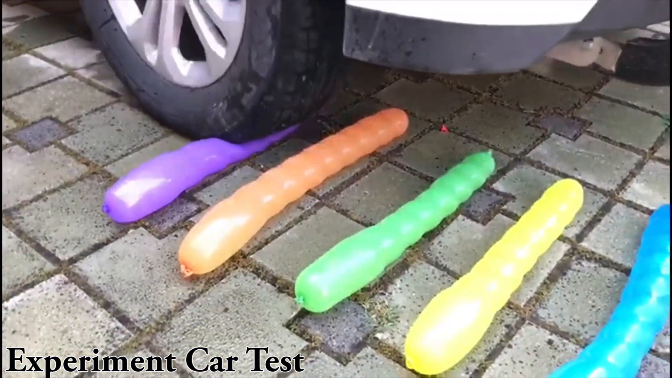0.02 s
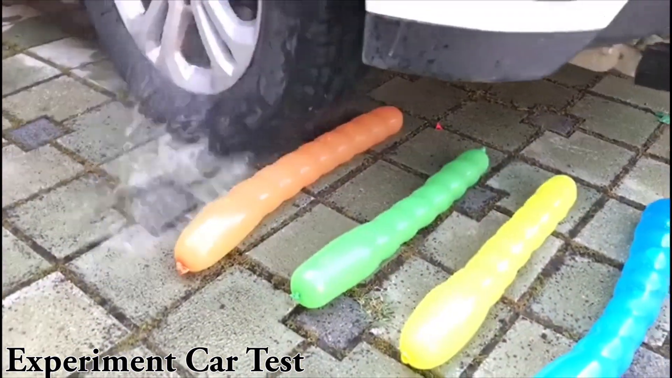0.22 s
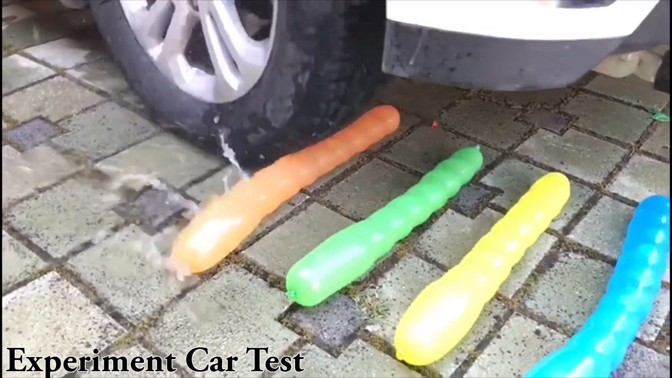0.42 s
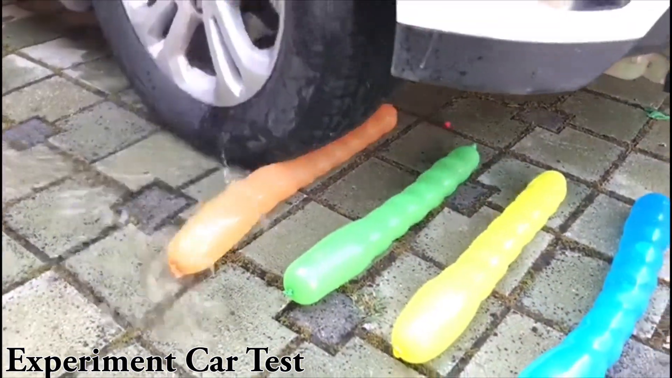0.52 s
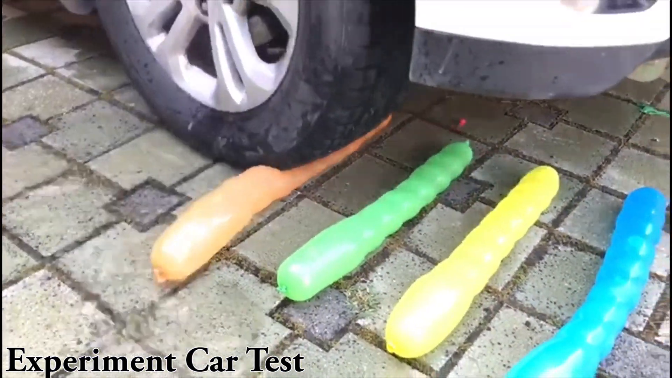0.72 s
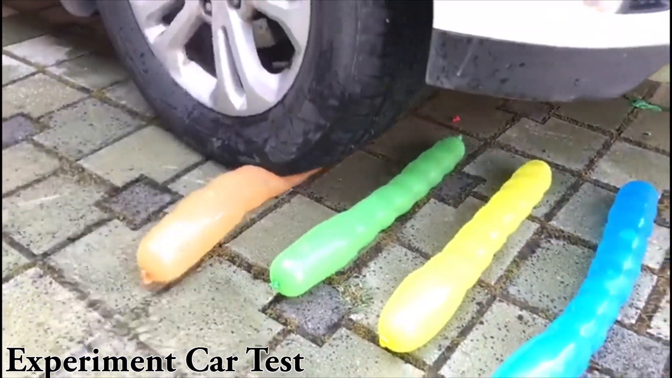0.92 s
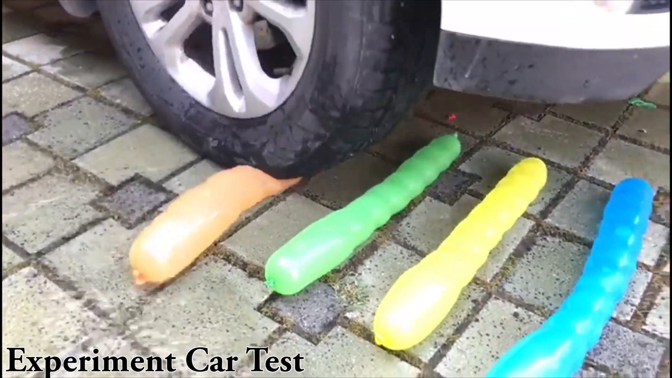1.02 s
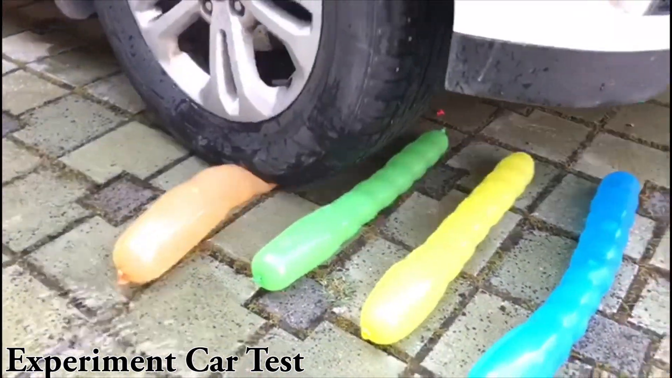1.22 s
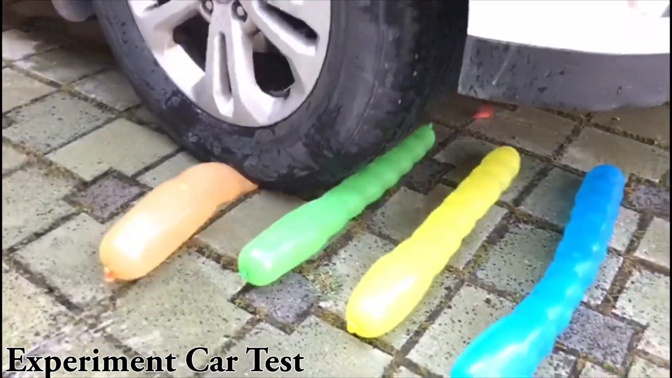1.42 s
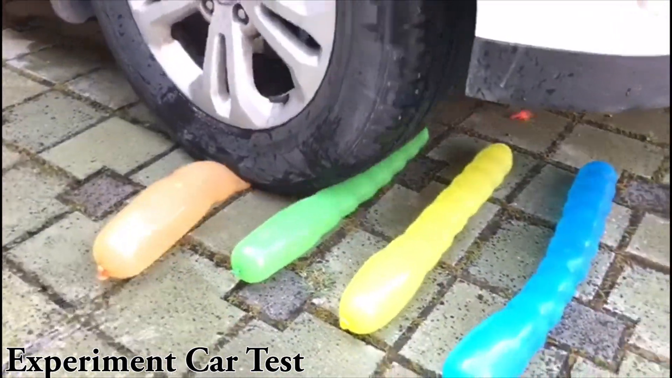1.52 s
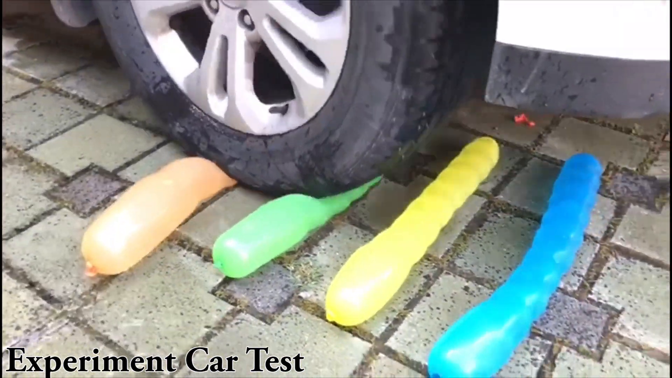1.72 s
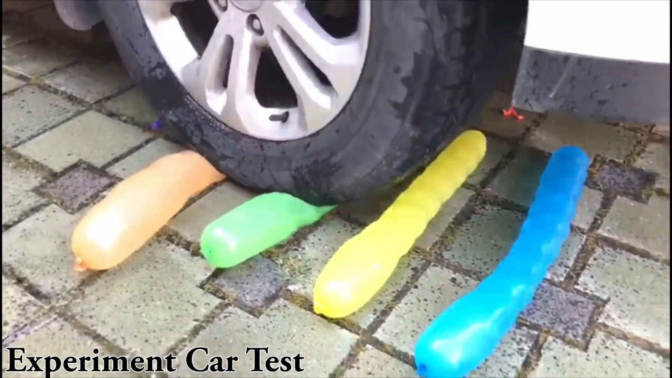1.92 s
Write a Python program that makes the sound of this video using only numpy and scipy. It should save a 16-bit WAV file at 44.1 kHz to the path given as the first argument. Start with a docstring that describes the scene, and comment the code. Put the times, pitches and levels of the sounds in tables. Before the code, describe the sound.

Two water balloons pop sharply about a second apart as a car tyre rolls over them, close to the microphone. Water patters onto wet paving and bubbles after each, while an engine idles faintly and birds twitter far off.

```python
"""On wet paving, close to the microphone, a car tyre creeps over long water balloons.
Two burst: the sudden release of pressure gives a sharp snap, and thrown water patters down.
Trapped air resonates as gurgling bubbles; the tread ticks on the stones and pinched rubber squeaks.
The engine idles low, what may be a puff of wind bumps the microphone,
and small birds twitter faintly far off."""
import sys
import numpy as np
from scipy import signal
from scipy.fft import rfft, irfft
from scipy.io import wavfile
from scipy.ndimage import uniform_filter1d

SR = 44100
rng = np.random.default_rng(int(sys.argv[2]) if len(sys.argv) > 2 else 0)


def unload_wav(signal):
    """Save mono or channel-first audio to the path in sys.argv[1] as 16-bit WAV at rate SR, clipped to [-1, 1]."""
    wavfile.write(
        sys.argv[1],
        SR,
        np.round(np.clip(np.atleast_2d(signal).T, -1, 1) * 32767).astype(np.int16),
    )


N = 88200
T, HZ = np.arange(N) / SR, np.fft.rfftfreq(N, 1 / SR)
ATTACK_S = 0.000474  # rise time of rips, froth and squeak


def amp(db):
    """Amplitude ratio of a level in decibels."""
    return 10 ** (np.asarray(db) / 20)


def unit(x):
    """Normalisation to rms 1."""
    return x / np.sqrt(np.mean(x ** 2) + 1e-20)


def curve_at(points, hz):
    """Interpolation of a table on a logarithmic frequency axis."""
    f, value = np.transpose(points)
    return np.interp(np.log(hz + 1), np.log(f + 1), value)


def noise(db):
    """Spectral shaping of white noise, at rms 1."""
    return unit(irfft(rfft(rng.standard_normal(N)) * amp(db), N))


def drift(hz):
    """Random modulation: noise of rms 1, low-passed at hz."""
    return noise(-20 * np.log10(1 + (HZ / hz) ** 4))


def tone(hz):
    """A sinusoid whose phase is the integral of its instantaneous frequency."""
    return np.sin(2 * np.pi * np.cumsum(hz) / SR)


def swell(start, rise, t60):
    """Envelope of a damped vibration: smooth rise, then exponential decay."""
    t, rise = T - start, max(rise, 1 / SR)
    onset = np.sin(np.pi / 2 * np.clip(t / rise, 0, 1))
    return onset * np.exp(-np.log(1000) * np.maximum(t - rise, 0) / t60)


def resonate(x, hz, width):
    """Forced response of a damped resonator of the given bandwidth in Hz."""
    phasor = np.exp(2j * np.pi * np.cumsum(hz * np.ones(N)) / SR)
    pole = np.exp(-np.pi * abs(width) / SR)
    return 2 * (phasor * signal.lfilter([1 - pole], [1, -pole], x / phasor + 1e-18)).real


def reverberation(x, t60_scale=1):
    """Diffuse reflection from car body and walls, lasting longest in the middle frequencies."""
    # Reverberation time at a scale of 1: f/Hz, t60/s
    decay_times = [(100, 0.21), (600, 0.53), (2000, 0.81), (5000, 0.49), (8000, 0.5), (12000, 0.6)]
    hz, t, spectra = signal.stft(rng.standard_normal(SR), SR, nperseg=256)
    t60 = t60_scale * curve_at(decay_times, hz)[:, None]
    tail = signal.istft(spectra * np.exp(-np.log(1000) * t / t60), SR)[1]
    tail *= np.minimum(np.arange(len(tail)) / SR / 0.0046, 1)  # builds up over 4.6 ms
    return signal.fftconvolve(x, tail / np.linalg.norm(tail))[:N]


def rumble_and_air():
    """Broadband noise: the slowly swelling rumble of the creeping car, and outdoor air."""
    # Swell of the rumble: t/s, relative level/dB
    rumble_swell = [(0., -4.5), (.85, 0.5), (1.2, 2), (1.45, 3), (2., -0.5)]
    # Rumble spectrum: f/Hz, relative density/dB
    rumble_spectrum = [(28, -15.5), (45, -2.5), (80, -3.5), (125, -9), (170, -12), (260, -12.5),
                       (450, -23.5), (1500, -29.5), (5000, -88)]
    # Air spectrum: f/Hz, relative density/dB
    air_spectrum = [(100, -18.5), (600, -0.5), (1500, -3), (2600, -7.5), (4200, -1), (7000, -14.5),
                    (11000, -19.5), (12000, -27), (12500, -45)]
    rumble = amp(-56 + np.interp(T, *np.transpose(rumble_swell))) * noise(curve_at(rumble_spectrum, HZ))
    air = amp(-59.5 + 0.45 * drift(5.8)) * noise(curve_at(air_spectrum, HZ))
    return rumble + air


def engine():
    """Line spectrum of the idling engine, each partial modulated in level and frequency."""
    # Partials: f/Hz, level/dB
    partials = [(46.4, -57), (101.7, -60), (73, -61.5), (114.5, -64.5)]
    flutter_db, waver = 1.5, 0.0306
    return sum(amp(db + flutter_db * drift(19)) * unit(tone(hz * (1 + waver * drift(5.53))))
               for hz, db in partials)


def warble(hz, width, rate_hz=110):
    """Random frequency modulation of one bird's voice, gated into syllables."""
    pitch = hz + width / 2 * np.tanh(drift(rate_hz))
    return np.maximum(drift(rate_hz), 0) * tone(pitch)


def birds():
    """Frequency-modulated whistles with reverberation: arched calls, short notes and farther twitter."""
    # Arched calls: t/s, level/dB
    calls = [(0.903, -58.5), (1.261, -57.5), (1.634, -62.5)]
    # Contour of a call: t/s from its start, f/Hz, relative level/dB
    contour = [(0, 3900, -2), (.009, 4100, 0), (.014, 5050, -16), (.033, 5750, 9), (.046, 5600, -19),
               (.056, 5000, 3), (.067, 3900, -2)]
    # Warbled notes: t/s, duration/s, level/dB, starting f/Hz, held f/Hz
    notes = [(0.045, 0.086, -58, 4050, 4060), (0.867, 0.074, -58, 4080, 4120),
             (0.961, 0.053, -59.5, 5700, 5700), (1.001, 0.021, -54, 3700, 4580),
             (1.324, 0.015, -56.5, 5700, 5570), (1.76, 0.026, -56, 3500, 3420),
             (1.791, 0.022, -58.5, 4100, 4080)]
    # Blurred twitter: t/s, duration/s, level/dB, starting f/Hz, final f/Hz, bandwidth/Hz
    twitters = [(0., 0.42, -56.5, 4400, 3514, 915), (0.619, 0.15, -57, 3946, 4300, 905),
                (0.795, 0.21, -56, 4216, 3547, 869), (0.966, 0.16, -58.5, 4000, 3944, 882),
                (1.144, 0.11, -64.5, 5350, 5930, 1120), (1.327, 0.11, -62, 5050, 4800, 1100),
                (1.641, 0.15, -64, 5850, 4880, 1105), (1.684, 0.18, -54.5, 4090, 3465, 930)]
    slide_s, waver, flutter, t60_scale = 0.0051, 0.02, 0.97, 0.345
    song, blur = np.zeros(N), np.zeros(N)
    call_s, call_hz, call_db = np.transpose(contour)
    for start, db in calls:
        envelope = np.interp(T - start, call_s, amp(db + call_db), left=0, right=0)
        song += uniform_filter1d(envelope, size=128) * tone(np.interp(T - start, call_s, call_hz))
    for start, length, db, start_hz, held_hz in notes:
        t = np.clip(T - start, 0, length)
        pitch = (held_hz + (start_hz - held_hz) * np.exp(-t / slide_s)) * (1 + waver * drift(150))
        song += amp(db) * np.sin(np.pi * t / length) * (1 + flutter * drift(90)) * tone(pitch)
    for start, length, db, start_hz, end_hz, width in twitters:
        progress = np.clip((T - start) / length, 0, 1)
        pitch = start_hz + (end_hz - start_hz) * progress
        voices = sum(warble(pitch, width) for voice in range(6))
        blur += amp(db) * np.sqrt(abs(np.sin(np.pi * progress))) * unit(voices)
    song += amp(1.5) * reverberation(song, t60_scale)
    return song + (blur + reverberation(blur, t60_scale)) / np.sqrt(2)


def bursts():
    """Impulse excitation: each rip is a pressure spike, a push of water and a rattle, briefly ringing."""
    # Rips of the rubber skin: t/s, level/dB, t60/s, treble tilt/(dB/octave), low cut f/Hz
    rips = [(.2159, -13.5, 0.094, 0.7, 299), (0.2252, -13.5, 0.06, -1, 303), (0.23, -18.5, 0.081, 2, 399),
            (1.3748, -18, 0.076, -1.5, 110)]
    # Rattle spectrum: f/Hz, relative density/dB
    rattle_spectrum = [(30, -52.5), (60, -12), (240, -6.5), (520, -10), (720, -4.5), (1000, -2), (1700, -8),
                       (2700, -2), (4800, -4), (6200, -2), (8300, -2.5), (10000, -8), (11400, -5),
                       (12500, -29)]
    # Narrow ringing peaks that colour the bursts' snap: f/Hz, bandwidth/Hz, gain/dB
    ring_peaks = [(960, 140, -8), (1647, 52, 3), (2455, 80, -7.5), (3340, 76, -2), (4417, 56, 4.5),
                  (6160, 60, -4), (7040, 26, 2.5), (8220, 68, 3)]
    snap_s, crack_s, push_s = 0.00046, 0.00005, 0.0012
    treble_octaves = np.log2(1 + HZ / 460)
    out = np.zeros(N)
    for start, db, t60, tilt_db, low_hz in rips:
        t = np.maximum(T - start, 0)
        envelope = swell(start, ATTACK_S, t60) * (1 + amp(6) * np.exp(-t / snap_s))
        hiss = noise(curve_at(rattle_spectrum, HZ) + tilt_db * treble_octaves)
        low_cut = signal.butter(2, low_hz, "high", fs=SR, output="sos")
        rattle = signal.sosfilt(low_cut, envelope * hiss)
        crack_time, push_time = (T - start - ATTACK_S) / crack_s, t / push_s
        crack = amp(12.5) * 2 * crack_time * np.exp(-crack_time ** 2)
        push = amp(-6.5) * push_time * (2 - push_time) * np.exp(-push_time)
        out += amp(db) * (crack + push + rattle)
    return out + sum(amp(db) * resonate(out, hz, width) for hz, width, db in ring_peaks)


def spray():
    """Shot noise: dense droplets of uneven size strike the stones at random."""
    # Thrown water landing: t/s, level/dB, rise/s, t60/s
    showers = [(0.24, -29.5, 0.02, 0.23), (0.337, -43, 0.031, 0.064), (0.399, -53.5, 0.047, 0.83),
               (1.408, -38, 0.024, 0.084), (1.47, -51.5, 0.082, 0.44)]
    # Impact spectrum: f/Hz, relative density/dB
    spectrum = [(200, -17.5), (700, -9), (2500, -2.5), (6000, -3.5), (9000, -10), (12000, -19)]
    drops_per_s, spread_db = 9000, 1.8
    impacts = rng.standard_normal(N) * amp(spread_db * np.minimum(rng.exponential(1, N), 4))
    drops = impacts * (rng.random(N) < drops_per_s / SR)
    patter = unit(irfft(rfft(drops) * amp(curve_at(spectrum, HZ)), N))
    return patter * sum(amp(db) * swell(start, rise, t60) for start, db, rise, t60 in showers)


def bubbles():
    """Bubble resonance: air squeezed through water rings briefly, mostly rising as it surfaces."""
    # Bubbles: t/s, starting f/Hz, level/dB, rise/s, t60/s, glide/(octaves/s)
    plips = [(0.248, 2470, -24.5, 0.0046, 0.02, -3), (.28, 671, -39, 0.0039, 0.06, 35.5),
             (.332, 1366, -39.5, 0.0033, 0.057, 4), (.46, 674, -45, 0.0049, 0.012, 11),
             (.468, 1270, -45, 0.0045, 0.039, -3), (.5643, 5530, -35, 0.00054, 0.0068, 78),
             (0.6692, 1745, -48, 0.00079, 0.029, -2), (0.7026, 1905, -34.5, 0.0004, 0.035, 16),
             (.828, 1265, -45, 0.0072, 0.03, 9), (1.5256, 1920, -27, 0.0029, 0.013, 1),
             (1.5281, 1025, -29, 0.00069, 0.016, 4), (1.529, 409, -42, 0.0015, 0.066, 7),
             (1.5625, 709, -32.5, 0.0028, 0.021, 18), (1.611, 1884, -48.5, 0.0045, 0.033, 3),
             (1.796, 730, -31.5, 0.0088, 0.037, 54), (1.897, 1000, -29, 0.0067, 0.03, -0.5)]
    glide_s, jitter_octaves, roughness = 0.016, 0.042, 0.27
    out = np.zeros(N)
    for start, hz, db, rise, t60, glide in plips:
        pitch = hz * 2 ** (glide * np.clip(T - start, 0, glide_s) + jitter_octaves * drift(300))
        envelope = amp(db) * swell(start, rise, t60) * (1 + roughness * drift(330))
        out += envelope * tone(pitch * (T >= start))
    return out


def grit():
    """Sparse shot noise: grit and water crackle as the tread rolls over wet stone."""
    # Spells of crackle: t/s, level/dB, rise/s, t60/s
    spells = [(.55, -56.5, 0.087, 2), (1.55, -63, 0.19, 1.7)]
    ticks_per_s = 1600
    ticks = rng.standard_normal(N) * (rng.random(N) < ticks_per_s / SR)
    envelope = sum(amp(db) * swell(start, rise, t60) for start, db, rise, t60 in spells)
    return envelope * unit(resonate(ticks, hz=4940, width=5200))


def clicks():
    """Heavily damped resonance: tread and rubber squelch on the stones in short puffs of noise."""
    # Wet contacts: t/s, level/dB, centre f/Hz, bandwidth of each filter pass/Hz, t60/s
    contacts = [(0.5722, -37, 8100, 5500, 0.0085), (0.6, -26.5, 6150, 3230, 0.0067),
                (0.5976, -47, 6540, 4960, 0.035), (0.604, -52.5, 306, 215, 0.092),
                (0.643, -49.5, 6150, 7000, 0.05), (.669, -49, 2660, 2180, 0.076),
                (.748, -42, 6260, 3130, 0.0098), (1.526, -31.5, 2320, 2740, 0.047),
                (1.532, -36.5, 570, 455, 0.076), (1.796, -51.5, 2460, 2830, 0.24),
                (1.899, -37.5, 610, 610, 0.053), (1.967, -53, 5470, 3560, 0.068)]
    out = np.zeros(N)
    for start, db, hz, width, t60 in contacts:
        puff = swell(start, 0.00024, t60) * rng.standard_normal(N)
        squelch = resonate(resonate(puff, hz, width), hz, width)
        out += amp(db) * np.std(puff) * unit(squelch)
    return out


def froth():
    """Free oscillation of tiny bubbles of random size, seething as the balloon is pinched flat."""
    count, first_s, span_s, low_hz, high_hz = 22, 0.74, 0.23, 950, 2600
    out = np.zeros(N)
    for when, smallness, strength in rng.random((count, 3)):
        start = first_s + span_s * when
        hz = low_hz * (high_hz / low_hz) ** smallness
        out += 2 * strength * swell(start, ATTACK_S, t60=0.022) * np.sin(2 * np.pi * hz * (T - start))
    return amp(-55.5) * out


def squeak():
    """Modal ringing after one slip of wet rubber pinched against the stone."""
    # Modes: f/Hz, relative level/dB, t60/s
    modes = [(941, -10.5, 0.11), (1510, 1, 0.015), (2165, -2, 0.035), (2600, -4, 0.029)]
    start, level_db = 0.7665, -35.5
    return sum(amp(level_db + db) * swell(start, ATTACK_S, t60) * np.sin(2 * np.pi * hz * (T - start))
               for hz, db, t60 in modes)


def buffeting():
    """Forced vibration: bumps, perhaps of wind, ring the microphone's case and set off sagging booms."""
    # Bumps: t/s, level/dB, rise/s, t60/s, frequency ratio
    puffs = [(.914, -40.5, .022, 0.36, 1.4), (0.974, -41.5, 0.031, 0.22, 1.3),
             (1.029, -43.5, 0.018, 0.8, 0.72)]
    # Bump spectrum at a ratio of 1: f/Hz, relative density/dB
    spectrum = [(20, -42), (45, -8.5), (90, -9), (135, -12.5), (180, -11.5), (260, -18), (400, -29),
                (700, -33), (1500, -47), (4000, -76)]
    # Resonances of the case: f/Hz, bandwidth/Hz, gain/dB
    case_modes = [(214, 36, -2.5), (329.4, 13, 5.5)]
    # Low booms: t/s, level/dB, rise/s, t60/s, starting f/Hz
    booms = [(.917, -32.5, 0.019, 0.14, 224), (0.927, -28.5, 0.032, 0.21, 105.8),
             (1.002, -28.5, 0.006, 0.093, 115)]
    sag_octaves_per_s = 7.4
    out = sum(amp(db) * swell(start, rise, t60) * noise(curve_at(spectrum, HZ / ratio))
              for start, db, rise, t60, ratio in puffs)
    out += sum(amp(db) * resonate(out, hz, width) for hz, width, db in case_modes)
    for start, db, rise, t60, hz in booms:
        pitch = hz * 2 ** (-sag_octaves_per_s * np.maximum(T - start, 0))
        out += amp(db) * swell(start, rise, t60) * tone(pitch * (T >= start))
    return out


def scene():
    """Superposition of all sources, with reverberation on the bursts and the sounds under the tread."""
    pops = bursts()
    wet = bubbles() + froth() + clicks() + squeak() + grit()
    echo = amp(-18.5) * reverberation(pops) + amp(-10.5) * reverberation(wet, t60_scale=0.22)
    return (pops + wet + echo + spray() + buffeting() + engine() + birds() + rumble_and_air())[None]


def record(dry):
    """Microphone response: low cut, soft saturation of the peaks, then a band limit."""
    low_cut = signal.butter(3, 28, "high", fs=SR, output="sos")
    band_limit = signal.firwin(301, 12150, window=("kaiser", 8), fs=SR)
    saturated = np.tanh(signal.sosfilt(low_cut, dry))
    return signal.oaconvolve(saturated, band_limit[None], "same")


dry = scene()
out = record(dry)
unload_wav(out)
```